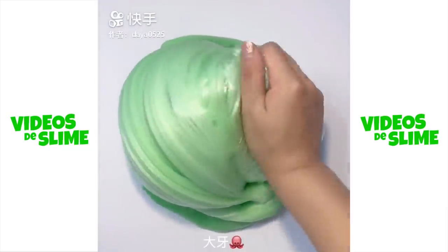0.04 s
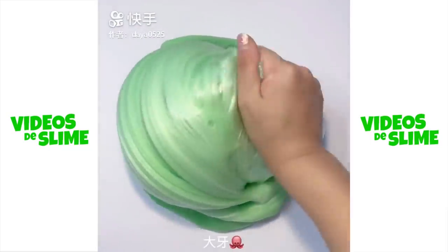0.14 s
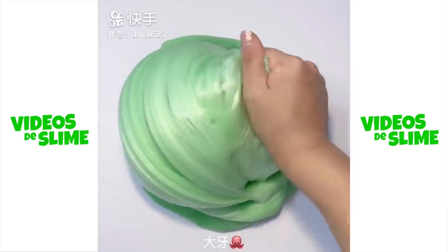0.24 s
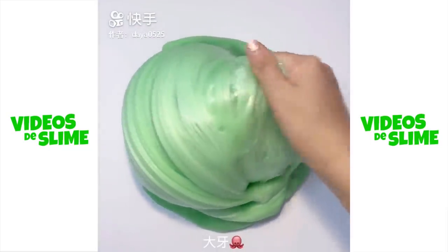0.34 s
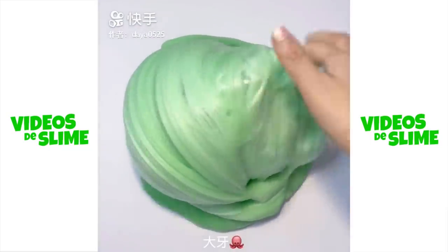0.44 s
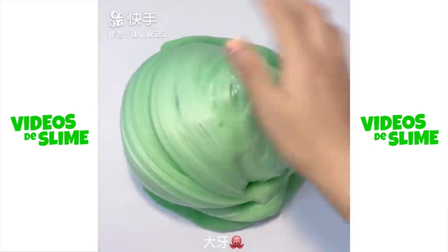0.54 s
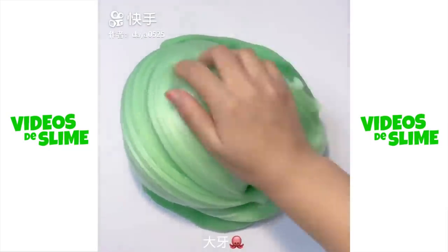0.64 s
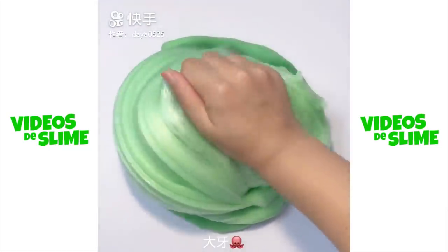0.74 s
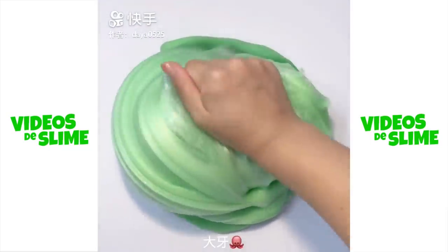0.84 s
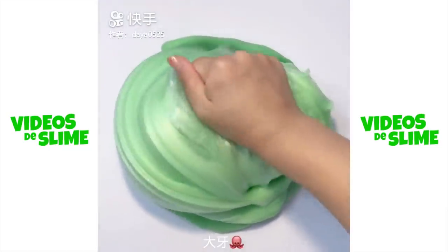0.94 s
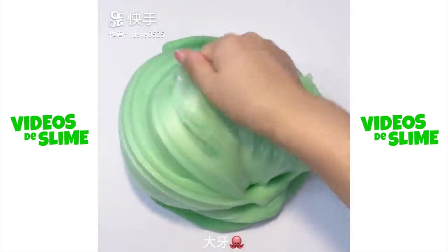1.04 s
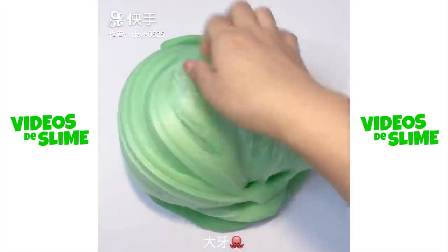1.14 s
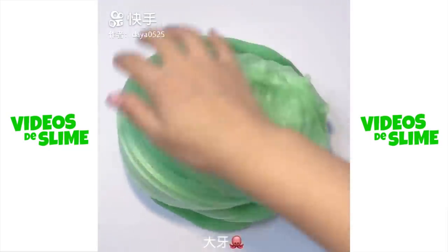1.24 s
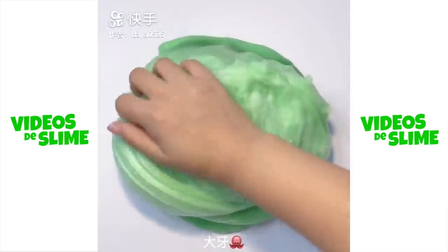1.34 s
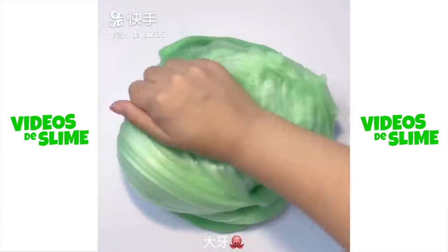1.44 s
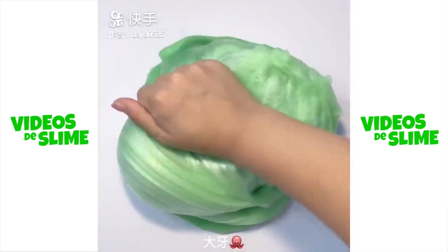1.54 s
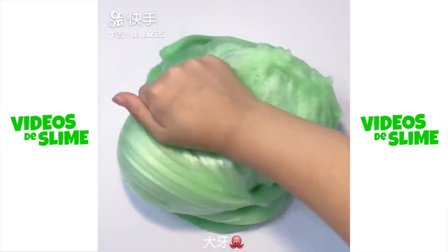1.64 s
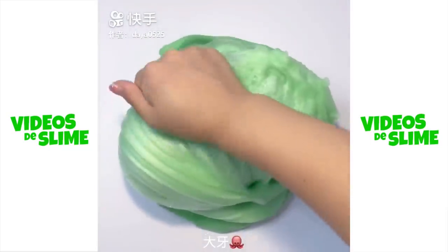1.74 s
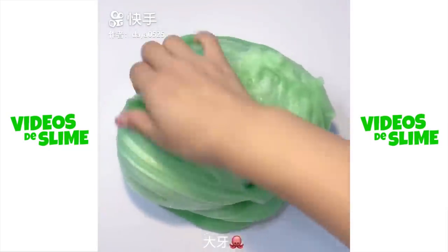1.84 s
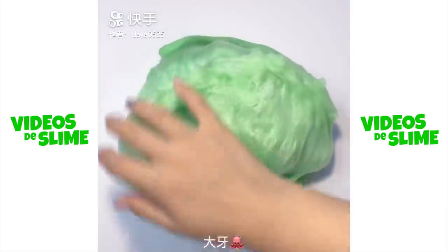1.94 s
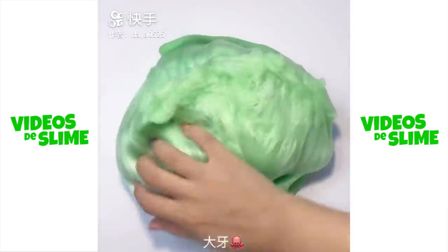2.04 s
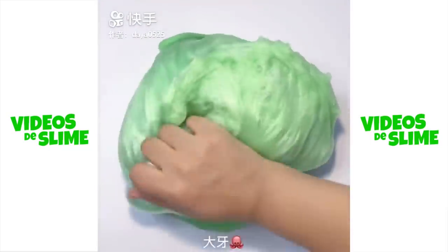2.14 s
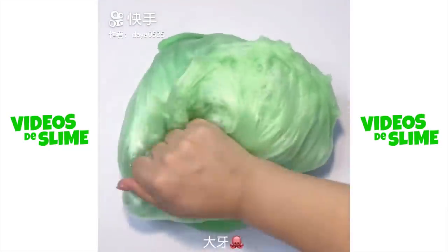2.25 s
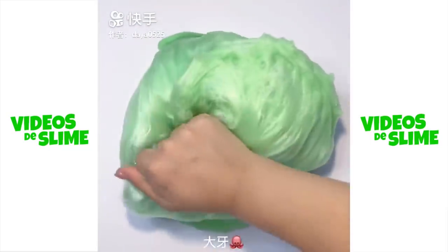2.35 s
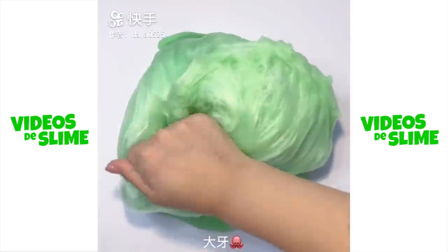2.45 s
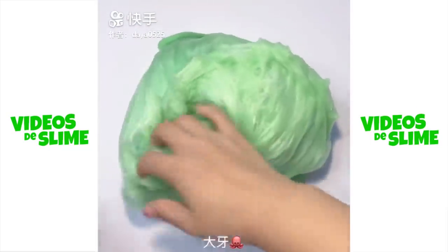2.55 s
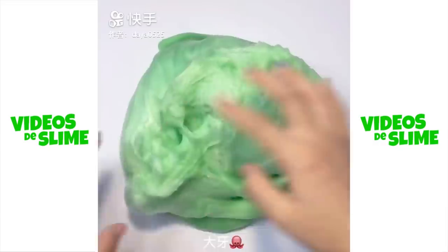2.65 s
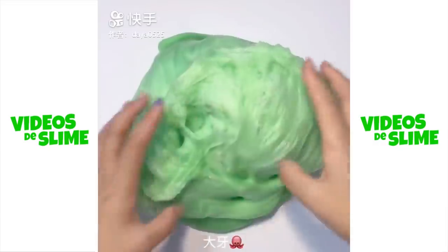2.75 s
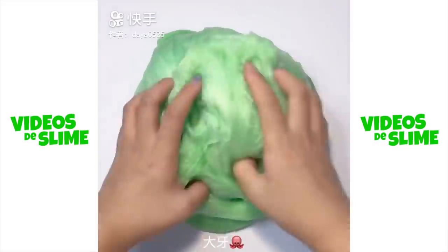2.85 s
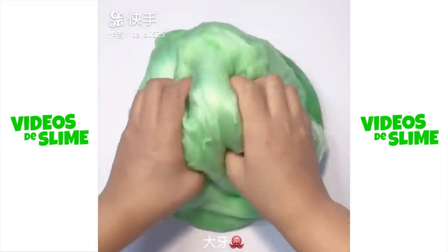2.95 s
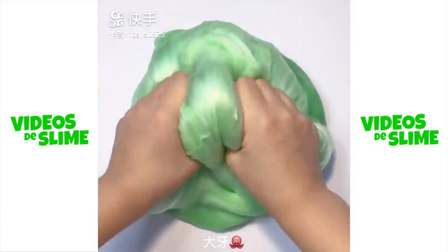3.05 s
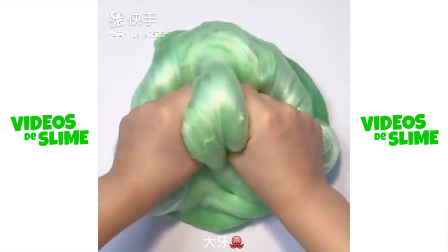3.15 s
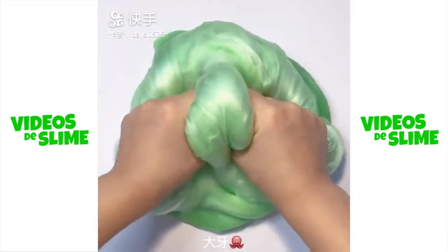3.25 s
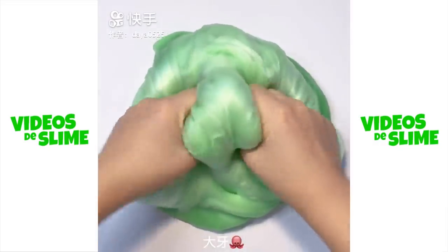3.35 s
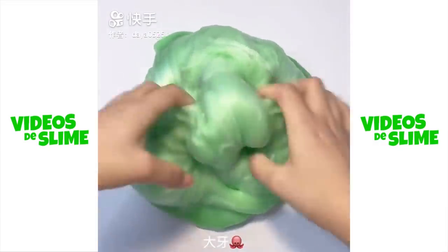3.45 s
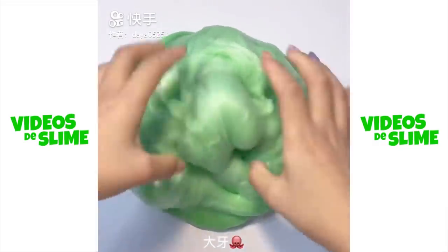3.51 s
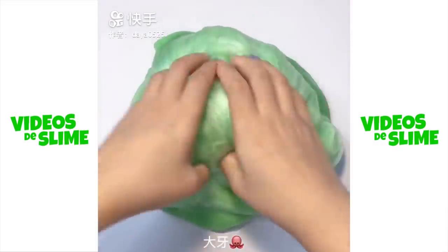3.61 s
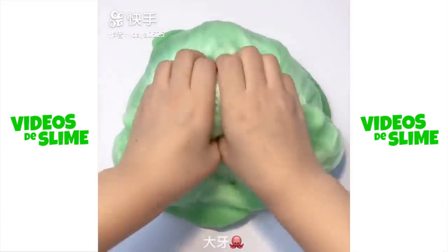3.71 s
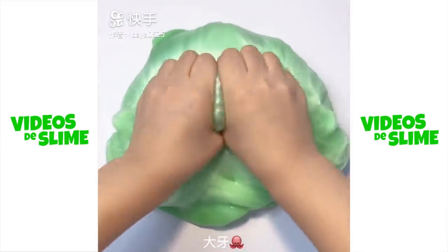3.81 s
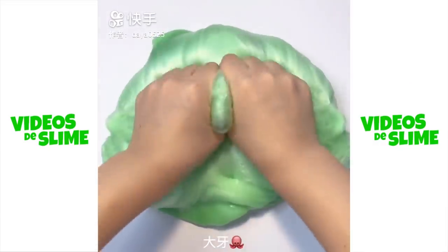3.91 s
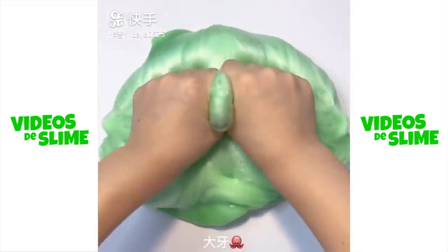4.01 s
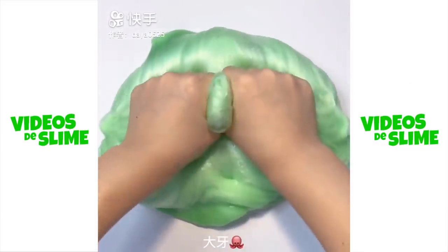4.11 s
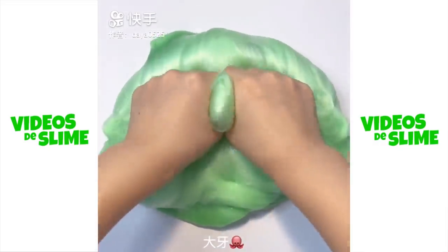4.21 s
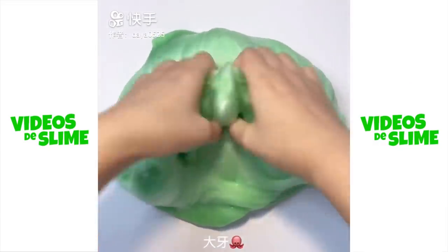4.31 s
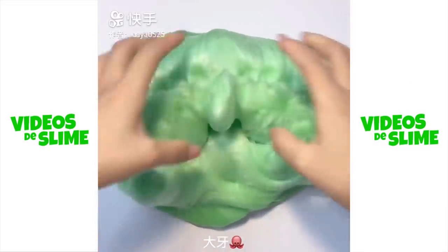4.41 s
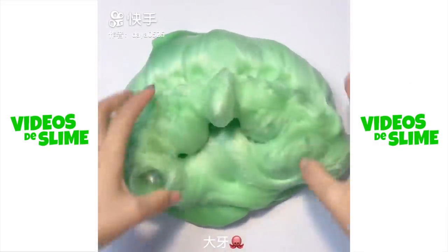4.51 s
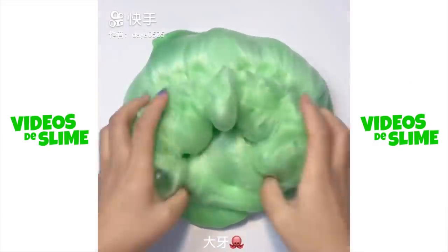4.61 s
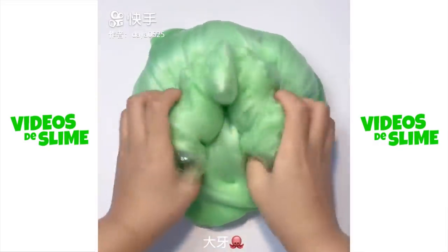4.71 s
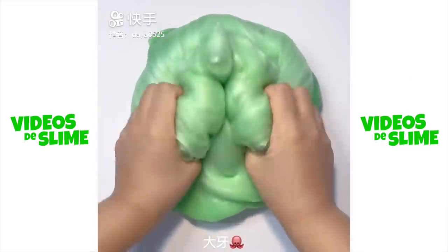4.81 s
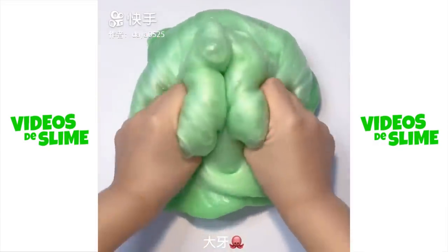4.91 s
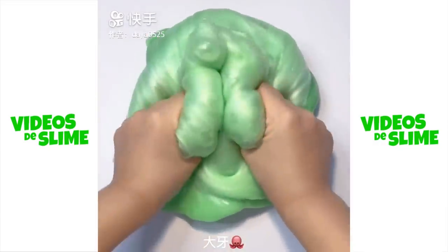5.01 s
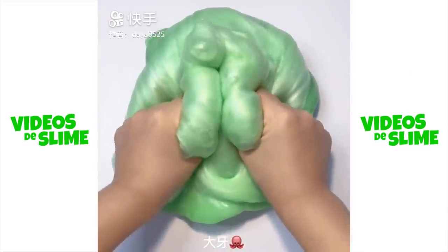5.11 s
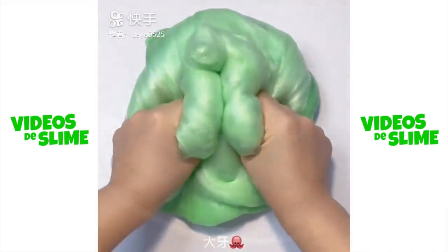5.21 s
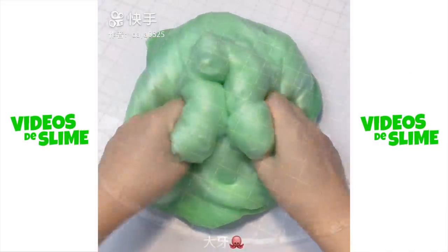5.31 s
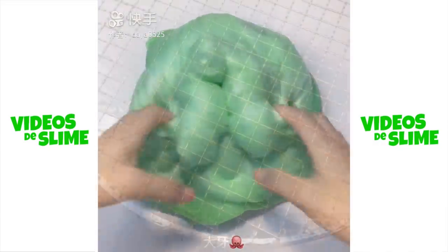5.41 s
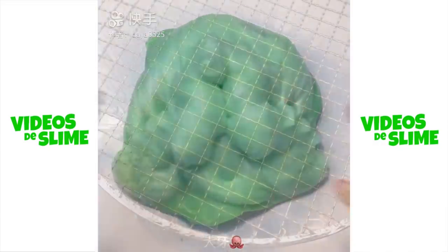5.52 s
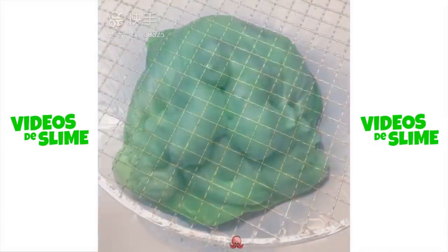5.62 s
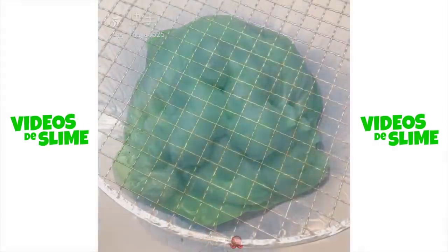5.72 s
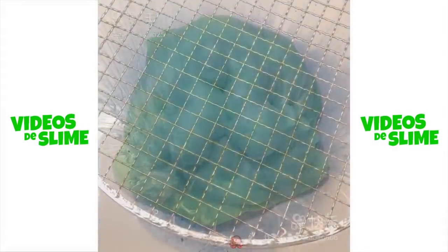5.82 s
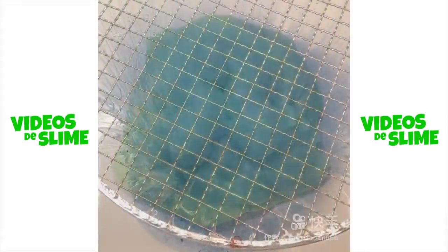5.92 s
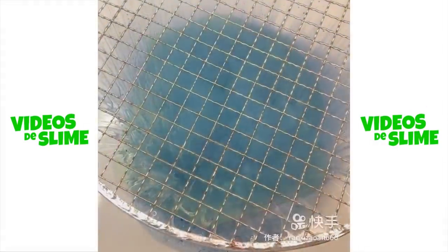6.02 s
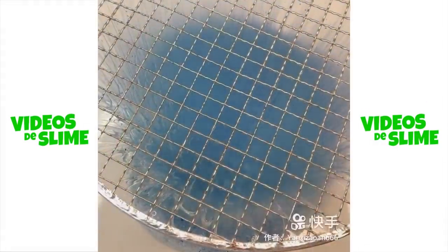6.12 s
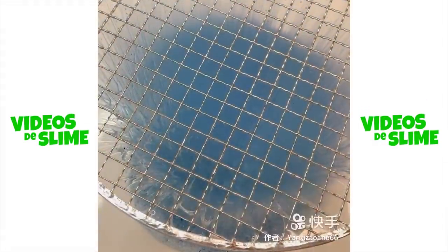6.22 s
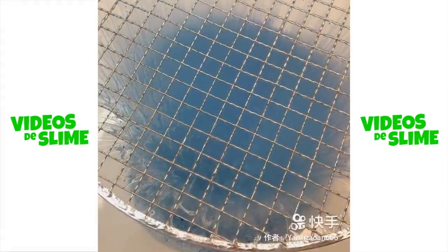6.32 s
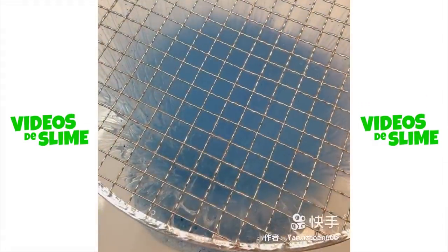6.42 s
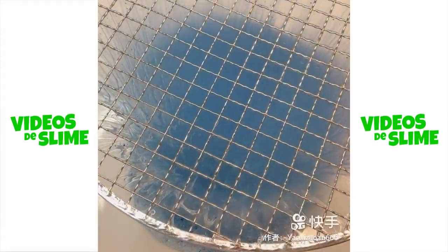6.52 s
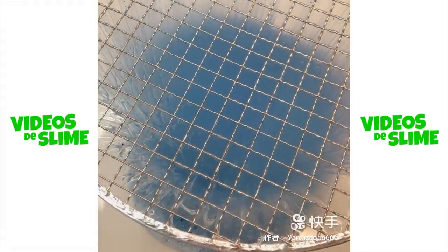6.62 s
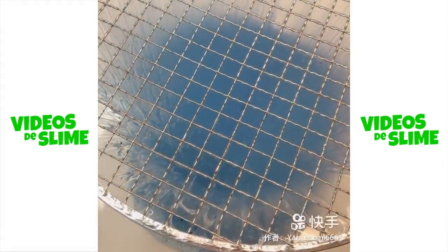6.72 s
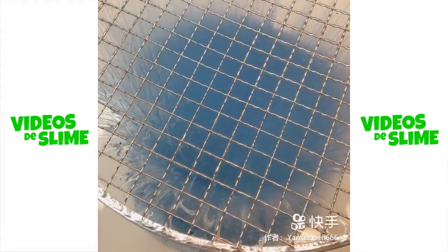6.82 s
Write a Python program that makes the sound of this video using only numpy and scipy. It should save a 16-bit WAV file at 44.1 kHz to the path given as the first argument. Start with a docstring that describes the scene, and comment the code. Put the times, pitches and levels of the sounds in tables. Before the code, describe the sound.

Hands press a big heap of fluffy slime seven times, each press bursting into sharp clicking pops and wet crackle, then a soft fizzing peel.

```python
"""A small room with a table: hands knead a heap of fluffy slime close to a phone.
Each of seven presses bursts air pockets: noise rushes with short rings, over a wet crackle of random grains.
The fingers then peel away with a soft fizz and a gurgle whose note sinks; big cavities give low sagging notes.
Table and room ring on, over wavering hum and hiss; all stops abruptly and quiet air with one tick is left."""
import sys
import numpy as np
from scipy import signal
from scipy.fft import rfft, irfft, next_fast_len
from scipy.io import wavfile
from scipy.ndimage import uniform_filter1d, map_coordinates

SR = 44100
rng = np.random.default_rng(int(sys.argv[2]) if len(sys.argv) > 2 else 0)


def int16_out(signal):
    """Quantize to a 16-bit WAV file."""
    q = np.round(np.clip(np.atleast_2d(signal).T, -1, 1) * 32767)
    wavfile.write(sys.argv[1], SR, q.astype(np.int16))


N = 302524


def amp(db):
    """Decibels to gain."""
    return 10 ** (np.asarray(db) / 20)


def unit(x):
    """Scale to rms 1."""
    return x / np.sqrt(np.mean(x ** 2) + 1e-20)


def along(points, hz):
    """Read (Hz, value) points on a log frequency axis."""
    point_hz, value = np.transpose(points)
    return np.interp(np.log(hz + 1), np.log(point_hz), value)


def filtered(x, response):
    """Multiply the spectrum of x by a response of frequency."""
    size = next_fast_len(len(x) + 4096)
    hz = np.fft.rfftfreq(size, 1 / SR)
    return irfft(rfft(x, size) * response(hz), size)[:len(x)]


def coloured(x, spectrum):
    """Shape x by the given spectrum, at rms 1."""
    return unit(filtered(x, lambda hz: amp(along(spectrum, hz))))


def add(track, start_s, sound):
    """Mix a sound into the track at start_s."""
    part = track[max(round(start_s * SR), 0):][:len(sound)]
    part += sound[:len(part)]


def during(spans):
    """1 inside the spans, 0 outside, with soft edges."""
    t = np.arange(N) / SR
    inside = sum(1. * ((t >= a) & (t < b)) for a, b in spans)
    return np.clip(uniform_filter1d(inside, SR // 30), 0, 1)


def grains(rate_hz, spread_db, decay_s):
    """Envelope of random bursts with instant onset and exponential decay; slow level swings evened out."""
    chance, size = rng.random(N), rng.standard_normal(N)
    energy = (chance < rate_hz / SR) * amp(spread_db * np.clip(size, -2, 2)) ** 2
    power = np.abs(signal.lfilter([1], [1, -np.exp(-2 / (decay_s * SR))], energy))
    local_mean = np.abs(uniform_filter1d(power, SR // 14))
    return np.sqrt(power / (local_mean + 0.066 * power.mean()))


# Bursting air pockets, from faint ticks to loud cracks. Each row: start in seconds, relative level in dB,
# ring pitch in Hz, length in seconds, treble tilt in dB.
BURSTING_POCKETS = [(0.012, -44, 4000, 0.007, -10), (.029, -43, 5000, 0.0064, -2),
                    (0.052, -36, 8140, 0.0049, -5), (.137, -43, 3590, 0.0027, -3),
                    (.178, -16.5, 2780, .004, -6.5), (0.192, -19.5, 6330, 0.0042, 11.5),
                    (.224, -17, 3730, 0.0042, 0), (0.24, -16, 5360, 0.0083, 7.5),
                    (0.249, -10, 8310, 0.0047, -10), (0.2636, -19, 7200, 0.011, 0),
                    (0.2803, -14.5, 3170, 0.0046, -5), (0.301, -15.5, 6230, .006, 6),
                    (0.31, -18, 6940, 0.0044, 4), (.319, -22, 1460, 0.0044, -7.5),
                    (0.3377, -16, 3280, 0.0049, 8.5), (0.348, -21, 5650, 0.0057, -7),
                    (0.3878, -14, 7820, .004, 2.5), (.399, -21, 5840, 0.0099, 9),
                    (0.415, -18, 1670, 0.0018, 3), (0.611, -37, 8800, 0.0064, -15),
                    (0.811, -39, 1500, 0.0022, -10.5), (.841, -26, 7180, 0.002, -2.5),
                    (0.859, -27.5, 7000, .005, -5.5), (0.863, -20.5, 3480, 0.004, -8),
                    (0.898, -14, 8000, 0.01, -11.5), (0.9064, -15, 7990, 0.013, 3),
                    (.94, -15.5, 1710, 0.0046, -4), (0.955, -17, 4930, 0.013, 2.5),
                    (0.974, -24, 9300, 0.0077, 4), (0.983, -19.5, 9160, 0.012, 6),
                    (1.005, -18.5, 9410, 0.0086, -4), (1.012, -16, 9375, .007, 10),
                    (1.0366, -17, 8240, 0.0063, 8.5), (1.053, -21.5, 7620, 0.0041, 7),
                    (1.067, -15, 7590, 0.006, 2), (1.081, -18.5, 7620, 0.0032, -0.5),
                    (1.157, -16.5, 7380, 0.0093, 2.5), (1.1713, -19, 1820, 0.0091, 9.5),
                    (1.452, -33.5, 1900, 0.01, -7), (1.492, -32.5, 2100, 0.0038, -14),
                    (1.579, -21, 1470, 0.0036, -7.5), (1.589, -20, 1275, 0.0057, -3.5),
                    (1.633, -22, 2485, 0.0053, 5), (1.637, -23.5, 3400, 0.0027, -5),
                    (1.658, -22, 9300, 0.017, 4), (1.676, -18.5, 8530, 0.013, 9),
                    (1.693, -12, 1440, 0.0033, 9), (1.705, -18.5, 1460, 0.0034, 0),
                    (1.7117, -18.5, 8420, 0.0062, 3), (1.723, -20, 8140, 0.028, 5),
                    (1.7844, -19.5, 6820, 0.022, 5.5), (1.801, -19, 9200, 0.016, 3),
                    (1.9285, -27.5, 3940, 0.0071, -7), (2.224, -42, 3820, .0015, 3),
                    (2.241, -32, 5050, 0.0094, 6), (2.263, -21.5, 5640, 0.0026, -4.5),
                    (2.277, -30, 5170, .002, 11), (2.2847, -20, 8970, .003, -0.5),
                    (2.311, -17, 4845, 0.0045, 3), (2.3217, -10.5, 5200, 0.002, 5),
                    (2.344, -13, 5080, .0033, -2.5), (2.3547, -15.5, 1870, 0.0096, 5),
                    (2.3685, -20, 6240, 0.0098, 8.5), (2.3904, -13.5, 6630, 0.0048, 8),
                    (2.403, -25, 6100, 0.016, 8), (2.422, -23, 4500, 0.0095, 9),
                    (2.434, -19.5, 2110, 0.005, 8), (2.444, -23, 7110, 0.0058, 12),
                    (2.473, -20, 7630, 0.0062, -2.5), (2.518, -16, 3655, 0.014, 6),
                    (2.935, -42, 4530, 0.0014, -3.5), (2.947, -39, 2600, 0.0015, 1),
                    (2.962, -39, 7000, .002, 2.5), (2.982, -20, 7080, 0.0038, 5),
                    (3.034, -27, 1540, .0024, -4.5), (3.082, -24, 7730, 0.0067, -2),
                    (3.124, -26.5, 7760, 0.0049, 4), (3.145, -21, 8350, 0.0076, 7.5),
                    (3.161, -22, 3520, 0.0071, 1.5), (3.1685, -21, 7310, 0.0047, 8.5),
                    (3.18, -15.5, 3495, 0.0071, -3), (3.198, -11.5, 3410, 0.0019, -4.5),
                    (3.218, -18.5, 3590, 0.0099, 4.5), (3.2437, -14.5, 5340, 0.0055, 3),
                    (3.257, -21, 4700, .012, 8), (3.276, -21, 1965, 0.0057, 0),
                    (3.2844, -17, 1980, 0.0031, -10), (3.318, -20, 9210, 0.0051, 16),
                    (3.358, -22, 5040, 0.0023, -4), (3.367, -21.5, 3990, 0.0064, 0),
                    (3.4496, -22.5, 3850, 0.0023, -5), (3.528, -22.5, 760, 0.004, -12),
                    (3.7755, -24, 7260, 0.0012, 0), (3.823, -22.5, 2140, 0.0018, -7),
                    (3.8723, -24, 7260, 0.0041, 8), (3.982, -27.5, 1320, 0.0058, -2),
                    (4.007, -26.5, 3870, 0.00069, -0.5), (4.027, -22, 4950, .005, 28),
                    (4.0354, -14.5, 1220, 0.01, -0.5), (4.053, -22, 3450, 0.0039, -5.5),
                    (4.11, -21, 860, 0.011, 0), (4.127, -23.5, 4160, 0.011, 20),
                    (4.152, -17, 7125, 0.0082, 5), (4.176, -22.5, 8300, 0.0061, 12),
                    (4.1913, -18, 8370, 0.0031, -5), (4.232, -16.5, 7070, 0.0053, 1),
                    (4.304, -32.5, 8440, .0034, 8), (4.384, -29.5, 1940, 0.005, 3),
                    (4.731, -36, 5970, 0.0028, 9), (4.752, -26.5, 5100, 0.0012, 5),
                    (4.7972, -32, 1049, 0.0067, 5.5), (4.818, -22.5, 5065, 0.0083, 2.5),
                    (4.8436, -27, 1080, 0.014, -1.5), (4.865, -22.5, 8870, 0.0094, 1),
                    (4.896, -23, 5450, .0026, 6), (4.921, -11, 890, 0.0048, -7),
                    (4.9566, -17.5, 8010, 0.0022, 3.5), (4.966, -17, 6860, 0.0042, 5),
                    (4.998, -23, 6100, 0.0011, 6), (5.011, -19.5, 6830, 0.0081, -3),
                    (5.035, -18, 6760, 0.0052, 1), (5.044, -19, 785, .014, -4),
                    (5.0623, -23, 820, 0.012, -7.5), (5.103, -19.5, 4660, 0.012, 6.5),
                    (5.1205, -16.5, 4670, 0.0029, 11.5), (5.132, -19.5, 7220, 0.0074, 22),
                    (5.15, -26, 1230, 0.0046, -4.5), (5.179, -30.5, 6980, 0.0024, 13),
                    (5.1985, -25, 8850, 0.0037, -1.5), (5.231, -29.5, 4660, 0.0014, -2),
                    (5.276, -21.5, 7230, 0.0023, 0.5), (5.281, -27.5, 6970, 0.0029, -1),
                    (5.32, -19, 3455, 0.0053, 1)]
SNAP_REFERENCE_S = .0016  # tear length at which the snap has gain snap_db


def pops(noise_db=2.5, ring_db=-4, fall_s=0.0014, ring_width_oct=0.61, ring_boost_db=6.5,
         snap_db=3, snap_s=0.00046):
    """A film tears with a snap: air rushes out for a few milliseconds while the pocket rings."""
    out, t = np.zeros(N), np.arange(SR // 25) / SR
    for start_s, db, pitch_hz, length_s, tilt_db in BURSTING_POCKETS + small_pops():
        skin = [(30, -26), (90, -14), (300, -4.5), (1500, -1.5), (2800, -2.0), (5500, tilt_db - 3),
                (9200, tilt_db - 4), (10500, tilt_db - 7.5), (16000, tilt_db - 15.5)]

        def rush_response(hz):
            """Skin colour plus the pocket's resonance."""
            octaves = np.log2((hz + 1) / pitch_hz)
            pocket_db = ring_boost_db * np.exp(-(octaves / ring_width_oct) ** 2)
            return amp(along(skin, hz) + pocket_db)

        rush = unit(filtered(rng.standard_normal(len(t)), rush_response))
        # each ring's pitch drifts slightly up or down, at random
        glide = 1 + rng.normal(0, .08) * (np.minimum(t / length_s, 2) - .5)
        ring = np.sin(2 * np.pi * np.cumsum(pitch_hz * glide) / SR)
        decay = np.exp(-.55 * t / length_s - np.maximum(t - 0.9 * length_s, 0) / fall_s)
        shape = (1 - np.exp(-t / 0.000057)) * decay
        # the quicker the tear, the harder its first snap
        snap = amp(snap_db) * np.exp(-t / snap_s) * (SNAP_REFERENCE_S / length_s) ** 2
        burst = shape * (1 + snap) * (amp(noise_db) * rush + amp(ring_db) * ring)
        burst_rms = np.sqrt(np.sum(burst ** 2) / (length_s * SR))
        add(out, start_s, amp(db - 0.5) * burst / burst_rms)
    return out


# Relative levels: at first touch, and over the foam's fizz; the louder of the two applies.
SMALL_TOUCH_DB, SMALL_OVER_FIZZ_DB, SMALL_SCATTER_DB = -37.5, -1, 3
SMALL_HZ, SMALL_SCATTER_OCT, SMALL_TILT_DB, SMALL_LENGTH_S = 4600, .8, 2, .0025


def small_pops(count=7, overrun_s=.03):
    """Lesser pockets are scattered through each press, louder where it bears harder."""
    rows = []
    for touch, full, ease, firm_db, fizz_db, _, _ in PRESSES:
        slots = (np.arange(count) + rng.random(count)) / count
        times = touch + (ease + overrun_s - touch) * slots
        scatter = np.clip(rng.standard_normal((count, 3)), -2, 2)
        for start_s, (size, tone, colour) in zip(times, scatter):
            pressure_db = press_db(start_s, touch, full, ease, firm_db, PRESS_FIZZ)
            db = max(SMALL_TOUCH_DB + firm_db, fizz_db + SMALL_OVER_FIZZ_DB + pressure_db)
            pitch_hz = SMALL_HZ * 2 ** (SMALL_SCATTER_OCT * tone)
            tilt_db = SMALL_TILT_DB + 4 * colour
            rows.append((start_s, db + SMALL_SCATTER_DB * size, pitch_hz, SMALL_LENGTH_S, tilt_db))
    return rows


# Air squeezed through a narrow neck. Each row: start in seconds, peak level in dB, first pitch in Hz,
# last pitch in Hz, length in seconds.
NECK_CHIRPS = [(1.006, -22, 2060, 2710, 0.0058), (1.011, -9.5, 8900, 9720, 0.0078),
               (1.161, -3, 7100, 6800, 0.0016), (1.165, -21.5, 1780, 1780, 0.019),
               (1.691, -15.5, 1382, 1520, 0.0064), (1.702, -15, 1380, 1500, 0.0023),
               (3.564, -23, 1530, 1710, 0.016), (4.9219, -1.5, 426, 1097, 0.0043),
               (4.928, -13.5, 1200, 910, .0068), (5.12, -13.5, 4330, 4907, .0048)]


def chirps():
    """Each neck gives a brief note, which mostly slides up or down."""
    out = np.zeros(N)
    for start_s, db, first_hz, last_hz, length_s in NECK_CHIRPS:
        pitch_hz = np.geomspace(first_hz, last_hz, max(int(length_s * SR), 8))
        note = np.sin(2 * np.pi * np.cumsum(pitch_hz) / SR)
        add(out, start_s, amp(db) * signal.windows.tukey(len(note), .5) * note)
    return out


# Texture colours. Each row: frequency in Hz, relative density in dB per Hz.
FIZZ_COLOUR = [(1500, -41.5), (2500, -2.5), (3400, 4), (5000, 0.5), (7200, -1), (9300, -3), (10200, -6.5),
               (15500, -19)]
SQUELCH_COLOUR = [(260, -30.5), (460, 2), (740, -5), (1100, 1), (1600, 3), (2400, 0), (3600, -27.5)]
# Texture under a press. Values: level at first touch in dB, level just before the foam yields in dB,
# yielding time in seconds, sag in dB/s, release in dB/s; levels relative to full weight.
PRESS_FIZZ = (-26.5, -21.5, 0.1, 34, 151)
PRESS_SQUELCH = (-21.5, -17, 0.13, 30, 140)
PRESS_GURGLE = (-24.5, -18.5, 0.2, 33, 114)
# Texture in a peel. Values: level at the start in dB, level on letting go in dB, release in dB/s;
# levels relative to the strongest moment.
PEEL_FIZZ = (-13.5, -8, 450)
PEEL_SQUELCH = (-18.5, -6.5, 510)
PEEL_GURGLE = (-22, -5.5, 200)
BUBBLES_PER_S = 3200


def kneading():
    """Foam crackles coarsely under pressure and fizzes finely when the fingers peel off."""
    fizz = effort(PRESS_FIZZ, PEEL_FIZZ, order=0)
    squelch = effort(PRESS_SQUELCH, PEEL_SQUELCH, order=1)
    gurgle = effort(PRESS_GURGLE, PEEL_GURGLE, order=2)
    pressing = during([(touch, ease + .04) for touch, _, ease, *_ in PRESSES])
    coarse_share = np.clip(.12 + 0.82 * pressing, 0, 1)
    fine = grains(rate_hz=BUBBLES_PER_S, spread_db=-1.0, decay_s=0.0009)
    shared = grains(rate_hz=200, spread_db=5.0, decay_s=0.0019)
    # the thinnest films give single needle-sharp ticks
    needles = grains(rate_hz=190, spread_db=1.5, decay_s=0.000051) * rng.standard_normal(N)

    def crackle(spectrum):
        """Some bursts sound in both fizz and squelch, others in only one."""
        own = grains(rate_hz=130, spread_db=5.5, decay_s=0.0039)
        coarse_power = (shared ** 2 + own ** 2) / 2
        power = coarse_share * coarse_power + (1 - coarse_share) * fine ** 2
        bubbles = np.sqrt(power) * rng.standard_normal(N)
        ticks = amp(-10) * np.sqrt(coarse_share) * needles
        return coloured(patchy(bubbles + ticks, depth_db=3.5), spectrum)

    foam = amp(-1.5) * (fizz * crackle(FIZZ_COLOUR) + squelch * crackle(SQUELCH_COLOUR))
    return foam + amp(-2.0) * gurgle * hollow()


# Hands bearing down. Each row: touch in seconds, full weight in seconds, easing off in seconds,
# firmness of first touch in dB, then relative fizz, squelch and gurgle levels in dB.
PRESSES = [(0.129, .255, 0.41, 2.5, -29, -39, -34.5), (0.771, .905, 1.084, -10.5, -30.5, -38, -29.5),
           (1.436, 1.68, 1.825, -8, -23, -35.5, -31.5), (2.179, 2.35, 2.53, -3.5, -26.5, -34.5, -30),
           (2.928, 3.19, 3.30, -3.5, -24, -31, -30.5), (3.77, 4.04, 4.093, -7.5, -17, -25.5, -25),
           (4.703, 4.925, 5.12, -1.5, -27, -29.5, -32.5)]
# Fingers peeling away. Each row: start in seconds, strongest in seconds, letting go in seconds,
# then relative fizz, squelch and gurgle levels in dB.
PEELS = [(0.455, 0.537, 0.6, -30.5, -33.5, -34), (1.146, 1.194, 1.297, -26.5, -32.5, -32),
         (1.894, 1.967, 2.023, -31, -31, -32.5), (2.587, 2.687, 2.734, -27.5, -27.5, -27.5),
         (3.483, 3.534, 3.626, -23, -26, -24), (4.374, 4.447, 4.525, -24.5, -25, -26.5),
         (5.403, 5.517, 5.616, -24.5, -25.5, -27)]


def effort(press_shape, peel_shape, order):
    """Gain of one texture (0 fizz, 1 squelch, 2 gurgle): powers of all presses and peels add."""
    t = np.arange(N) / SR
    pressing = [amp(dbs[order] + press_db(t, touch, full, ease, firm_db, press_shape))
                for touch, full, ease, firm_db, *dbs in PRESSES]
    peeling = [amp(dbs[order] + peel_db(t, start, peak, off, peel_shape))
               for start, peak, off, *dbs in PEELS]
    return np.sqrt(np.sum(np.square(pressing + peeling), axis=0))


def press_db(t, touch, full, ease, firm_db, shape):
    """A press creeps up, the foam yields quickly, sags under the hand and is released."""
    touch_db, creep_db, yielding_s, sag_db_per_s, release_db_per_s = shape
    times = [touch - .02, touch, max(full - yielding_s, touch), full]
    rise = np.interp(t, times, [-80, touch_db + firm_db, creep_db + firm_db / 2, 0])
    sag = sag_db_per_s * np.clip(t - full, 0, ease - full)
    return rise - sag - release_db_per_s * np.maximum(t - ease, 0)


def peel_db(t, start, peak, off, shape):
    """A peel swells, thins as the contact shrinks and stops when the skin comes free."""
    start_db, off_db, release_db_per_s = shape
    swell = np.interp(t, [start - .03, start, peak, off], [-80, start_db, 0, off_db])
    return swell - release_db_per_s * np.maximum(t - off, 0)


def patchy(x, depth_db):
    """Changing folds boost different pitches from moment to moment."""
    z = signal.stft(x, nperseg=256)[2]
    field = uniform_filter1d(rng.standard_normal(z.shape), size=4, axis=0)
    field = uniform_filter1d(field, size=5, axis=1)
    return signal.istft(z * amp(depth_db * unit(field)), nperseg=256)[1][:N]


# Gurgle under a press. Each row: frequency in Hz, relative density in dB per Hz.
GURGLE_COLOUR = [(25, -31.5), (60, -19.5), (110, -3.5), (170, -4), (260, 3), (400, -0.5), (540, -12.5),
                 (1000, -33.5)]


def hollow(narrow_hz=430, wide_hz=135, width_oct=0.86, linger_s=.07):
    """The heap gurgles broadly under a press; while the fingers lift, its note sinks."""
    t = np.arange(N) / SR
    opening = np.zeros(N)
    for start, _, end, *_ in PEELS:
        opening = np.where(t > start - .05, np.clip((t - start) / (end - start), 0, 1), opening)
    pitch_hz = narrow_hz * (wide_hz / narrow_hz) ** opening
    # a moving resonance, cross-faded over fixed third-octave bands
    centres_hz = np.geomspace(80, 1000, 12)
    weights = np.exp(-(np.log2(centres_hz[:, None] / pitch_hz) / width_oct) ** 2 / 2)

    def noise_band(centre_hz):
        """Noise around one band centre, at rms 1."""
        noise = rng.standard_normal(N)
        return unit(filtered(noise, lambda hz: np.exp(-(np.log2((hz + 1) / centre_hz) * 4) ** 2)))

    bands = np.array([noise_band(centre_hz) for centre_hz in centres_hz])
    sinking = np.sum(weights * bands, axis=0) / np.sqrt(np.sum(weights ** 2, axis=0))
    bursts = grains(rate_hz=220, spread_db=5.5, decay_s=0.0071) * rng.standard_normal(N)
    pressed = coloured(bursts, GURGLE_COLOUR)
    peeling = during([(start, end + linger_s) for start, _, end, *_ in PEELS])
    return np.sqrt(peeling) * sinking + np.sqrt(1 - peeling) * pressed


# Large cavities opening or collapsing. Each row: start in seconds, relative peak level in dB,
# nominal pitch in Hz, t60 in seconds.
CAVITIES = [(.181, -21.5, 304, 0.02), (0.245, -32, 60, .04), (0.249, -23, 210, 0.051),
            (.944, -17, 256, 0.08), (1.083, -17, 445, 0.03), (1.084, -13.5, 252, .019),
            (1.594, -11.5, 250, 0.061), (1.809, -22.5, 242, 0.088), (2.323, -16, 440, 0.011),
            (2.354, -11, 420, 0.013), (2.472, -18, 553, 0.014), (3.088, -17.5, 490, 0.01),
            (3.188, -11, 214, 0.016), (3.19, -14, 512, .017), (3.527, -18, 505, 0.034),
            (3.911, -22, 298, 0.061), (4.044, -13.5, 160, 0.012), (4.05, -24, 60, 0.11),
            (4.059, -9.5, 179.4, 0.058), (4.073, -20.5, 123.5, 0.22), (4.085, -14.5, 223, 0.079),
            (4.435, -24, 170.2, .03), (4.461, -15, 207, 0.049), (4.986, -11.5, 491, 0.013),
            (5.059, -16.5, 177, 0.016), (5.068, -14.5, 593, 0.018), (5.457, -13.5, 354, 0.03)]
# the heap settles on the table as the fingers let go: a low note
SETTLE_REL_DB, SETTLE_HZ, SETTLE_T60_S = -33, 124.4, 0.41


def glugs(attack_s=0.0022, sag=0.071, sag_s=0.028):
    """Big cavities give a soft, low note that sags as the slime gives way."""
    out, t = np.zeros(N), np.arange(SR // 2) / SR
    settling = [(off, SETTLE_REL_DB, SETTLE_HZ, SETTLE_T60_S) for _, _, off, *_ in PEELS]
    for start_s, db, nominal_hz, t60_s in CAVITIES + settling:
        pitch_hz = nominal_hz * (1 + sag * (np.exp(-t / sag_s) - .5))
        note = np.sin(2 * np.pi * np.cumsum(pitch_hz) / SR)
        shape = (1 - np.exp(-t / attack_s)) ** 2 * amp(-60 * t / t60_s)
        add(out, start_s, amp(db - 3.5) * shape / shape.max() * note)
    return out


# Low resonances of table and room. Each row: frequency in Hz, relative level in dB, t60 in seconds.
RESONANCES = [(113.2, 5.5, 0.46), (173.4, 4.5, 0.39), (222, -7.5, 0.1), (277, -13.5, 0.14)]


def boom(x):
    """Table and room hum on at a few low pitches after each push."""
    t = np.arange(SR) / SR
    ring = np.zeros(SR)
    for hz, db, t60_s in RESONANCES:
        per_sample = 2 * np.log(1000) / (t60_s * SR)  # unit gain at resonance
        ring += amp(db - 60 * t / t60_s) * np.cos(2 * np.pi * hz * t) * per_sample
    return signal.fftconvolve(x, ring)[:N]


# Room decay, longest in the treble. Each row: frequency in Hz, t60 in seconds.
ROOM_DECAY = [(150, 0.12), (700, 0.14), (3000, 0.36), (8000, 0.39), (15000, 0.33)]


def room(x, early_db=8, early_s=0.018):
    """Near surfaces answer at once, then a faint tail of decaying noise dies away."""
    hz, t, z = signal.stft(rng.standard_normal(SR // 2), SR, nperseg=256)
    decay = amp(-60 * t / along(ROOM_DECAY, hz)[:, None])
    tail = signal.istft(z * decay, SR, nperseg=256)[1]
    t = np.arange(len(tail)) / SR
    tail = tail * (1 + amp(early_db) * np.exp(-t / early_s)) * np.clip(t / 0.0044, 0, 1)
    return signal.fftconvolve(x, tail / np.linalg.norm(tail))[:N]


# Room hum and hiss. Each row: frequency in Hz, relative density in dB per Hz.
HUM_COLOUR = [(25, -22.5), (70, -9), (118, 9.5), (190, -9), (500, -36), (2000, -68)]
HISS_COLOUR = [(200, 0), (700, 4), (2500, 1), (8800, -3), (12000, -9), (16000, -22)]
HUM_DB, HISS_DB = -52, -63  # rms before the waver


def room_tone(waver_db=4.0):
    """The room hums and hisses faintly behind the slime; its level wavers."""
    steps = np.arange(N) * 8 / SR  # eight random levels a second, smoothly joined
    waver = amp(waver_db * map_coordinates(rng.standard_normal(64), [steps]))
    hum = amp(HUM_DB) * coloured(rng.standard_normal(N), HUM_COLOUR)
    hiss = amp(HISS_DB) * coloured(rng.standard_normal(N), HISS_COLOUR)
    return waver * (hum + hiss)


# Quiet air. Each row: frequency in Hz, relative density in dB per Hz.
AIR_COLOUR = [(25, -18), (40, -8), (53, -2.5), (65, -7.5), (80, -21), (120, -9), (170, -21), (370, -23),
              (480, -31), (1100, -34.5), (2800, -40), (9000, -44.5), (13000, -50), (16000, -54)]


def quiet():
    """Faint air as coloured noise, with one soft high tick after all else has stopped."""
    t = np.arange(N) / SR
    air = amp(-62) * coloured(rng.standard_normal(N), AIR_COLOUR)
    tick_colour = [(3500, -42), (5500, -2), (8500, -2), (10500, -40)]
    tick = coloured(rng.standard_normal(N), tick_colour)
    return air + amp(-62) * np.exp(-((t - 5.797) / 0.011) ** 2) * tick


END_S = 5.71
POP_ROOM_DB, MASS_ROOM_DB, BOOM_DB = -9, -14, 2.5


def scene():
    """All sound stops abruptly; after a moment of silence only the quiet air is left."""
    t = np.arange(N) / SR
    bursts = pops() + chirps()
    mass = kneading() + glugs()
    answer = amp(POP_ROOM_DB) * room(bursts) + amp(MASS_ROOM_DB) * room(mass)
    answer += amp(BOOM_DB) * boom(bursts + mass)
    playing = np.clip((END_S - t) / 0.0035, 0, 1)
    resumed = np.clip((t - END_S - .03) / 0.01, 0, 1)
    kneaded = playing * (bursts + mass + answer + room_tone())
    return (kneaded + (playing + resumed) * quiet())[None]


TOP_HZ = 16000


def record(dry, ceiling_db=-10.5, hardness=6):
    """The phone rounds off the loudest peaks and keeps almost nothing above its band limit."""
    overload = np.abs(dry[0] / amp(ceiling_db)) ** hardness
    held = dry[0] / (1 + overload) ** (1 / hardness)
    return filtered(held, lambda hz: 1 / (1 + (hz / TOP_HZ) ** 120))[None]


dry = scene()
out = record(dry)
int16_out(out)
```